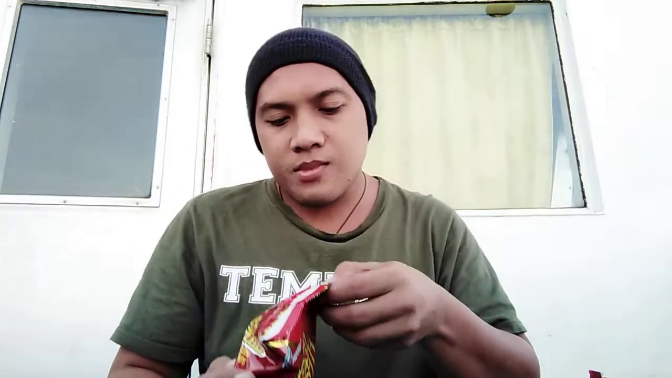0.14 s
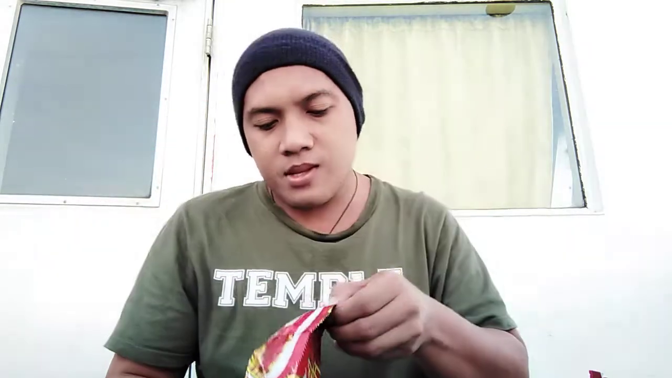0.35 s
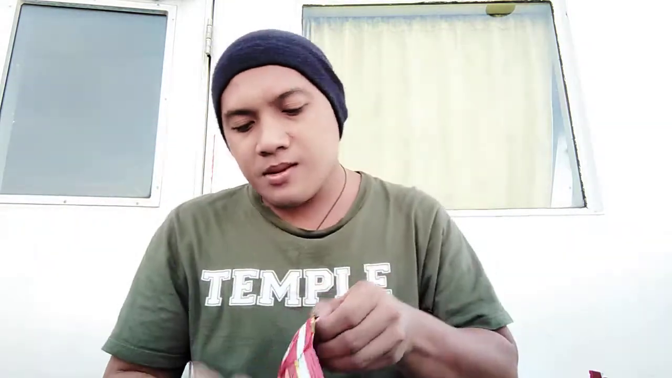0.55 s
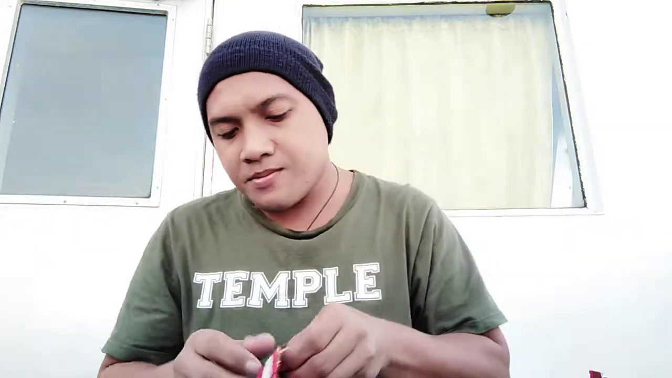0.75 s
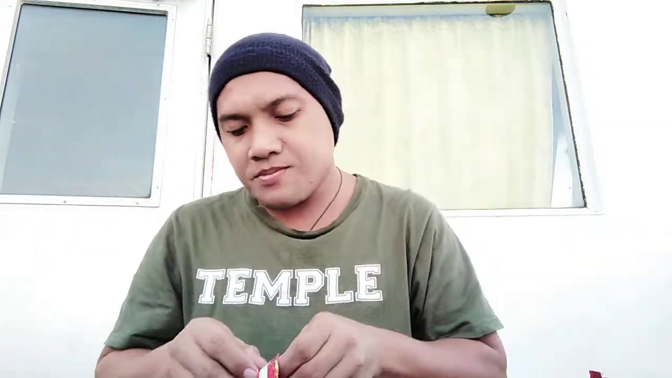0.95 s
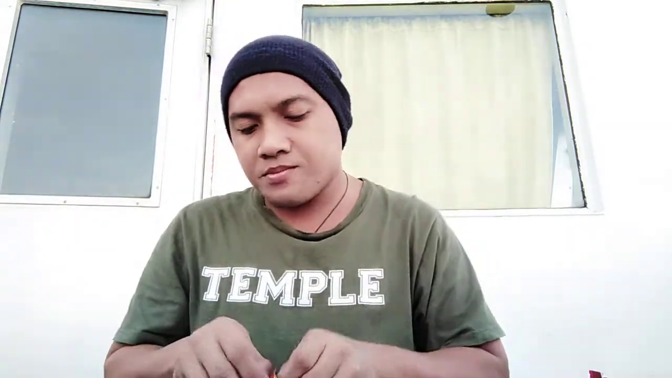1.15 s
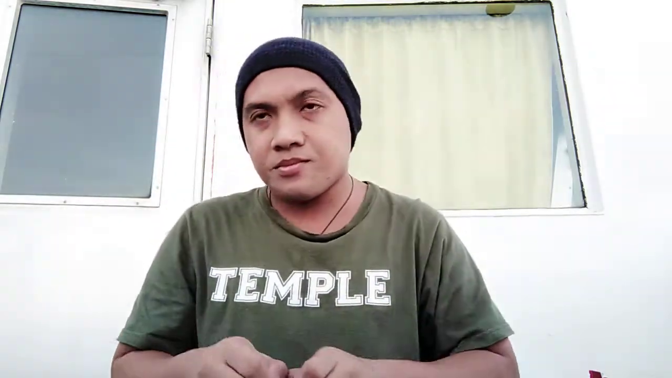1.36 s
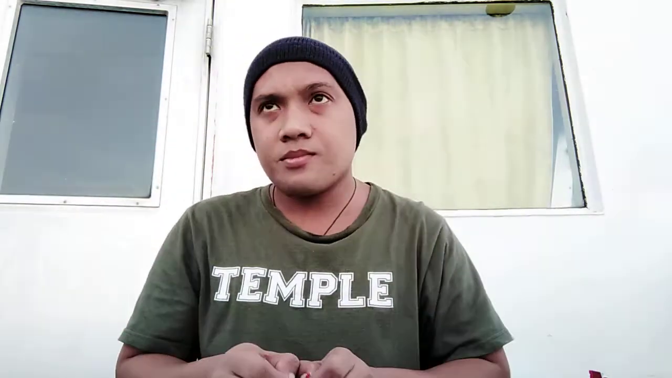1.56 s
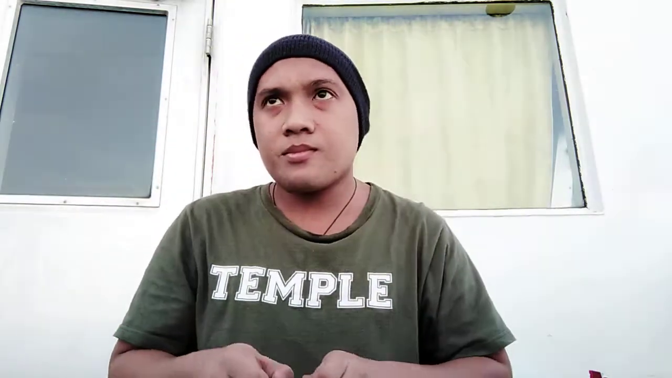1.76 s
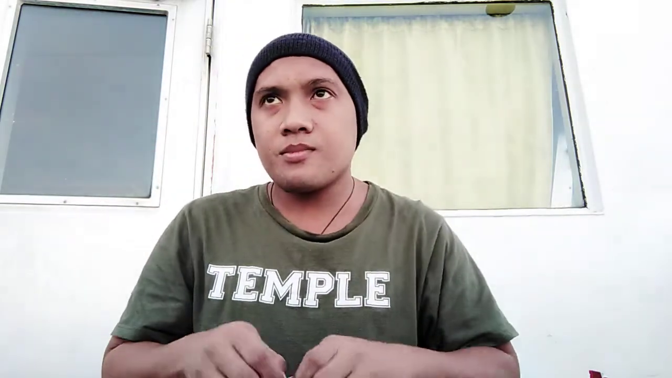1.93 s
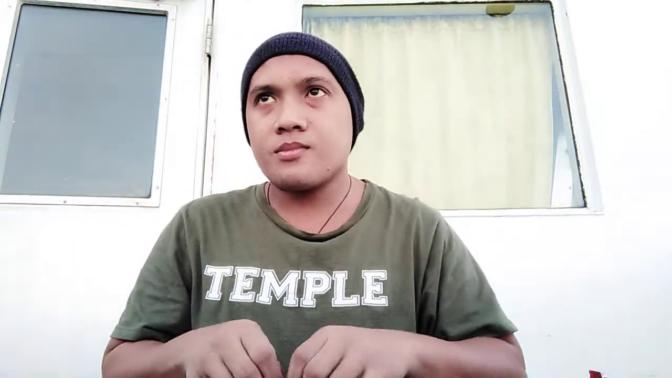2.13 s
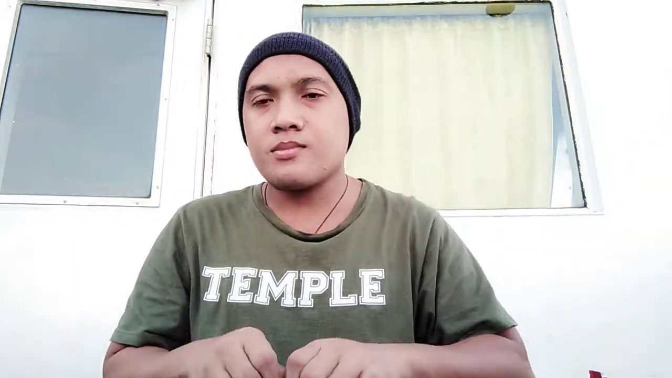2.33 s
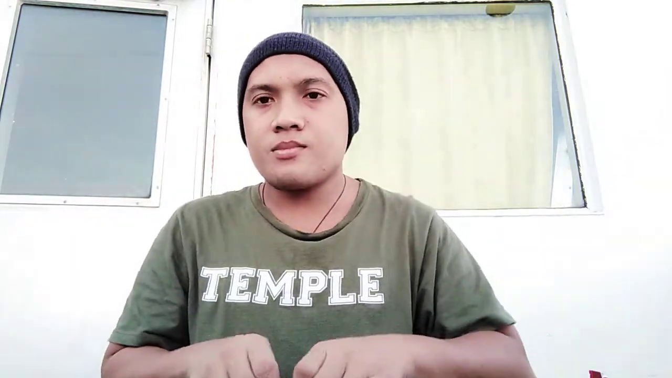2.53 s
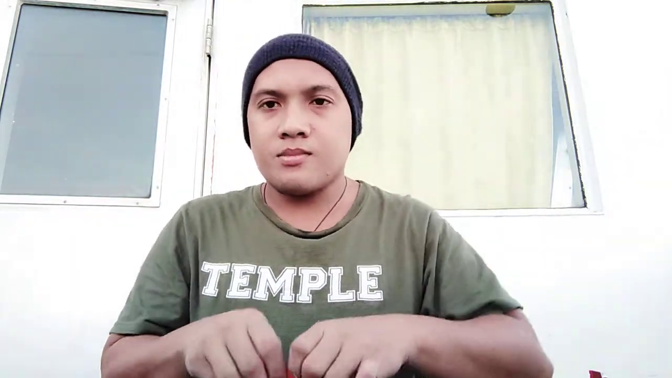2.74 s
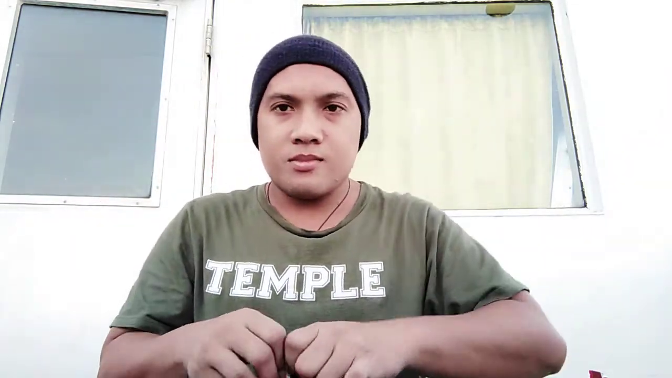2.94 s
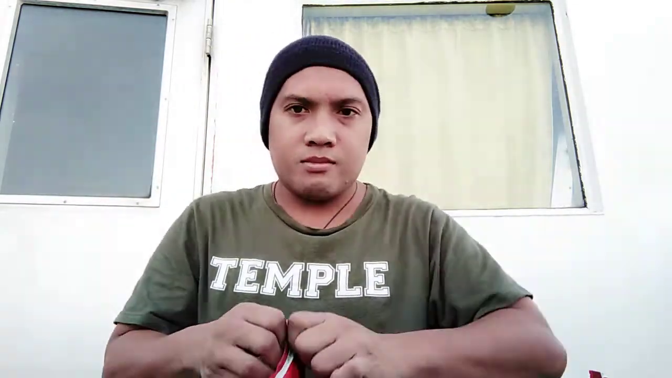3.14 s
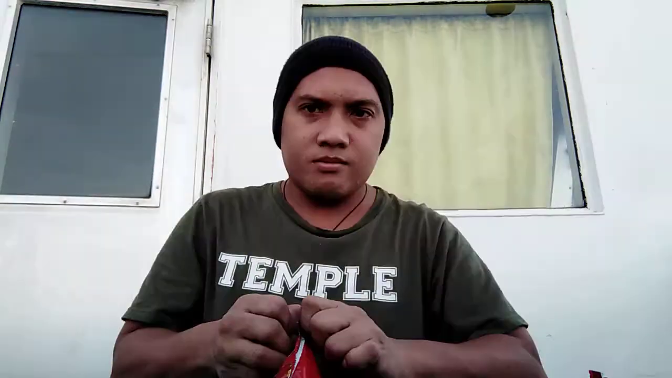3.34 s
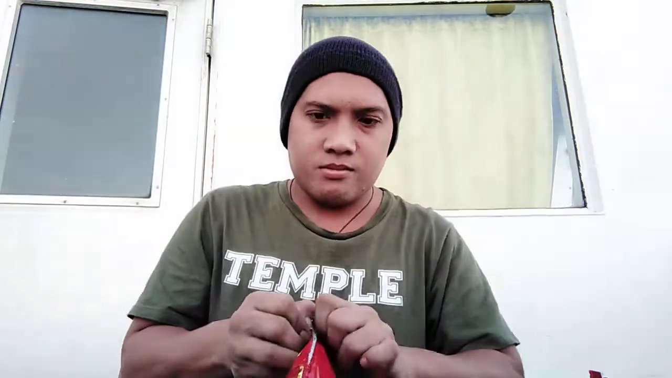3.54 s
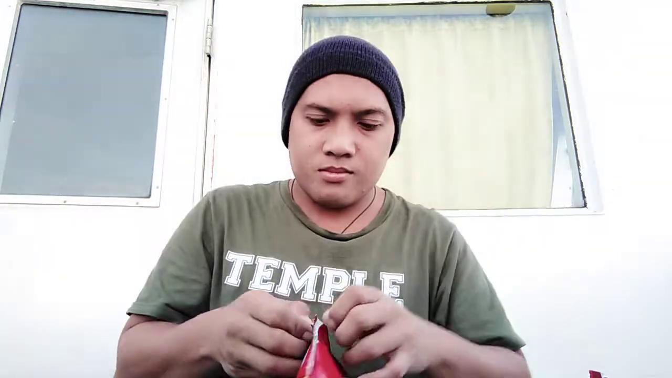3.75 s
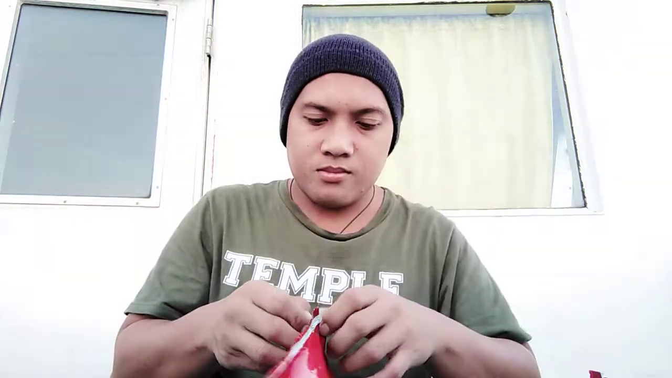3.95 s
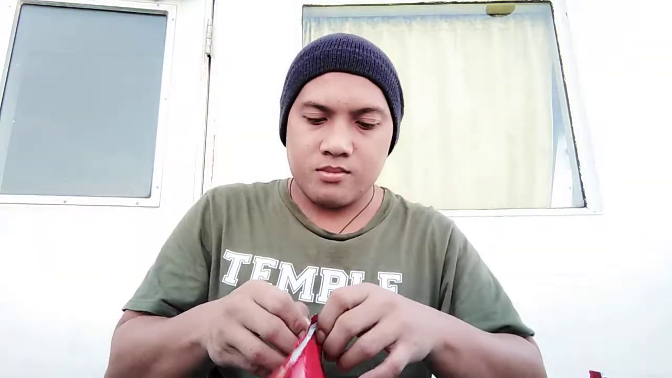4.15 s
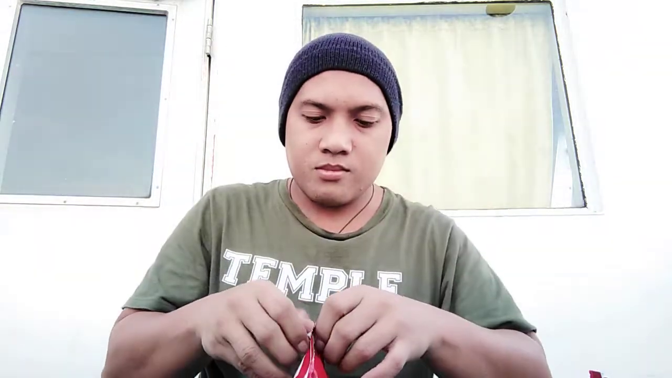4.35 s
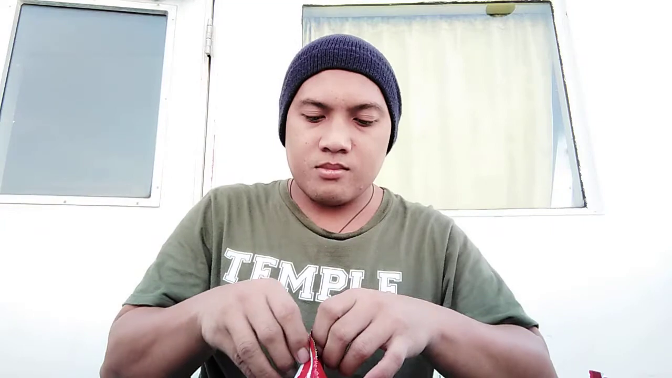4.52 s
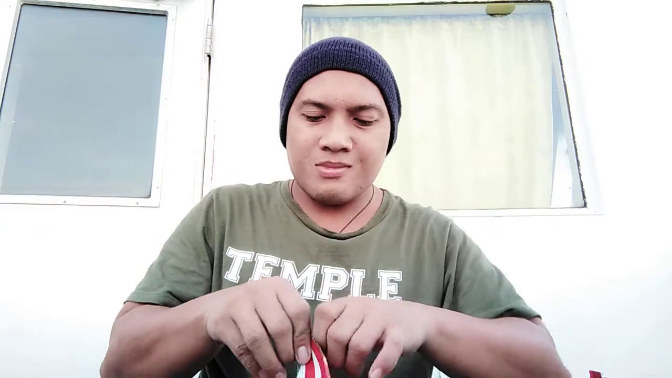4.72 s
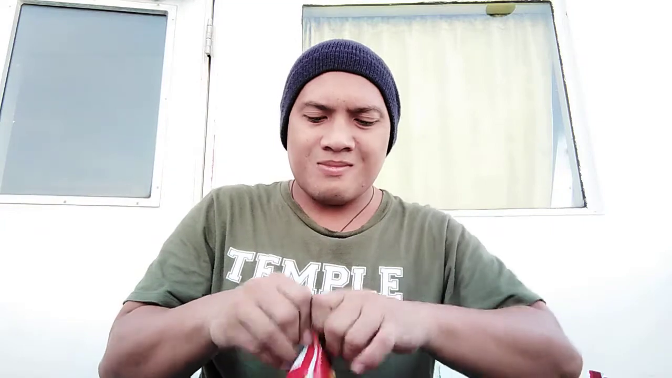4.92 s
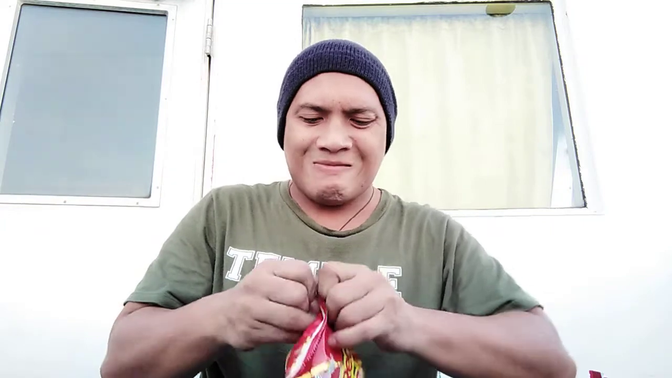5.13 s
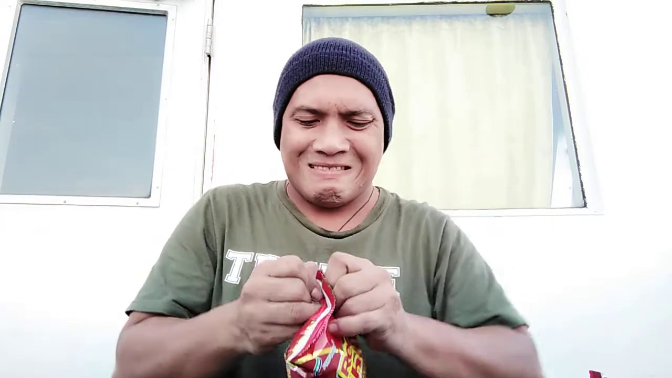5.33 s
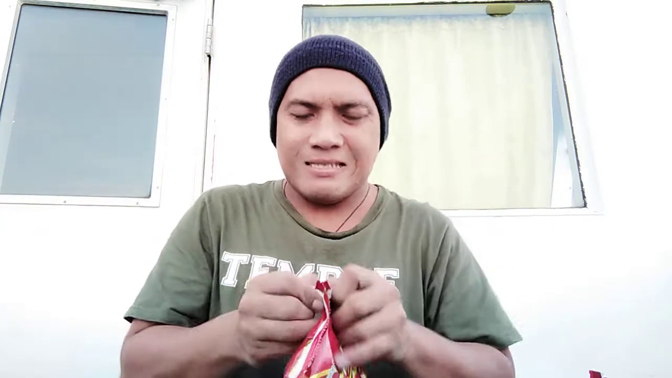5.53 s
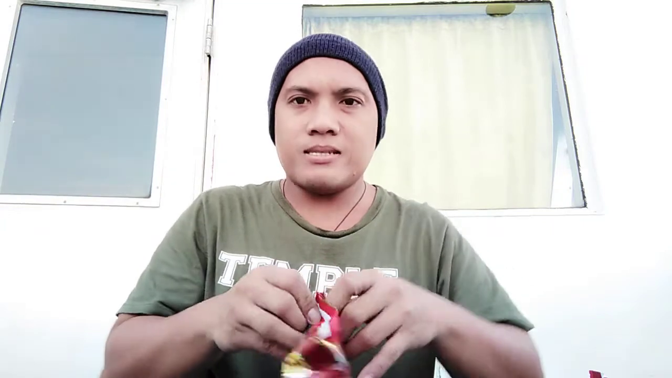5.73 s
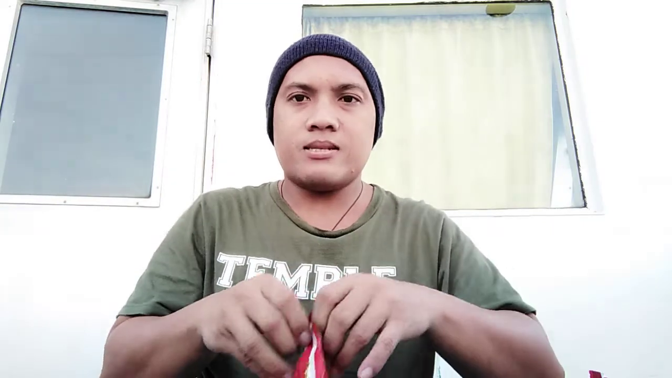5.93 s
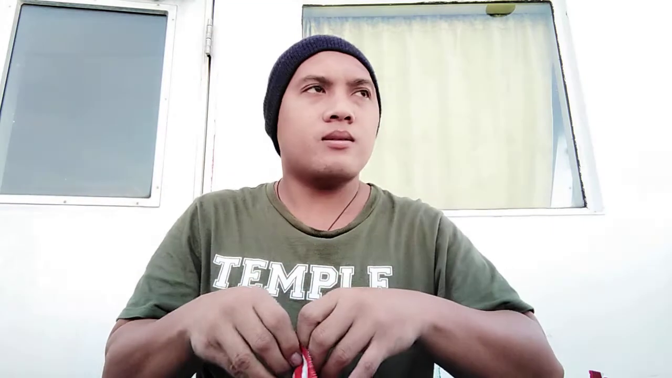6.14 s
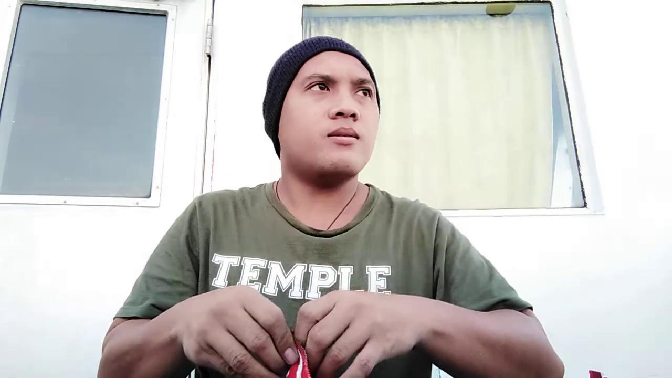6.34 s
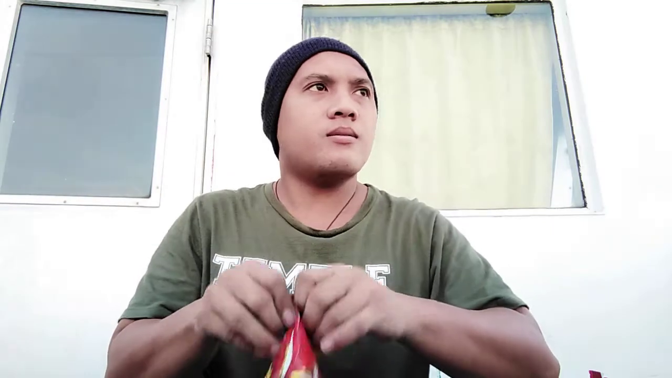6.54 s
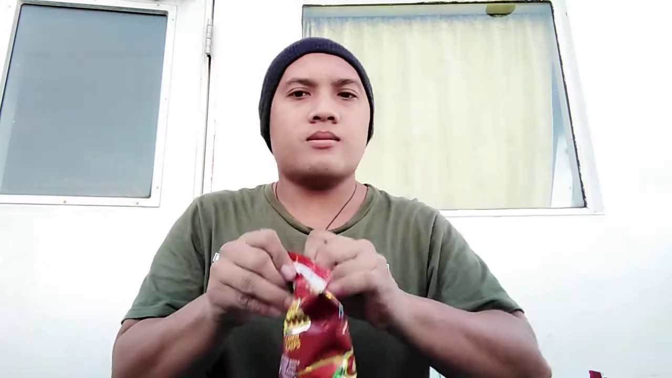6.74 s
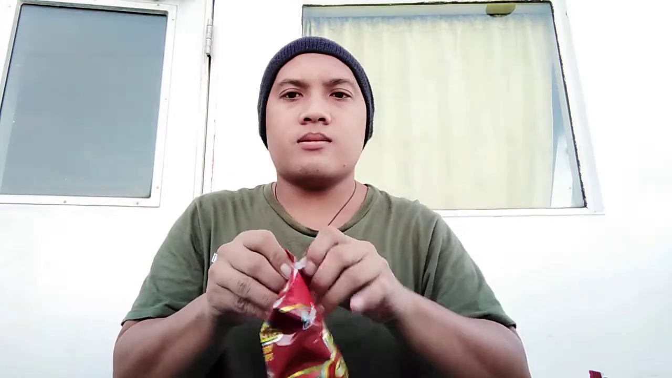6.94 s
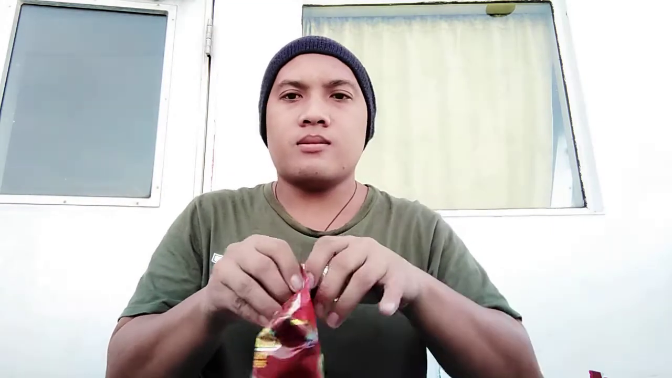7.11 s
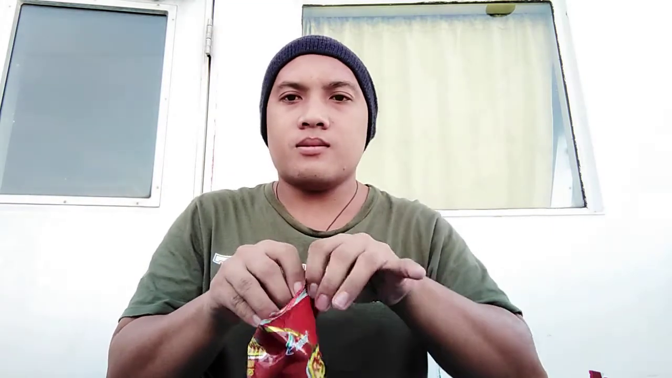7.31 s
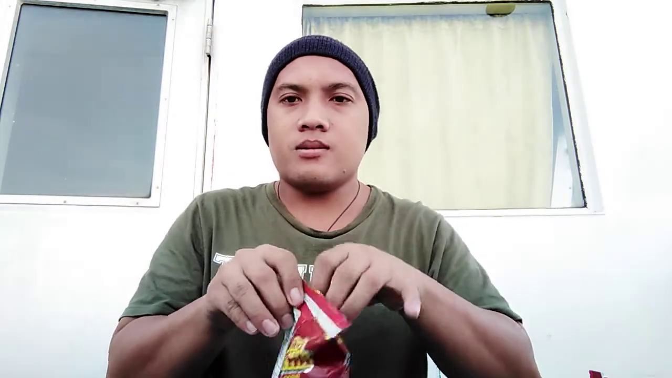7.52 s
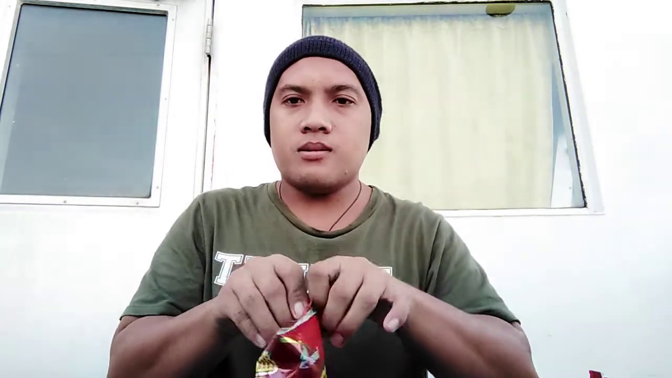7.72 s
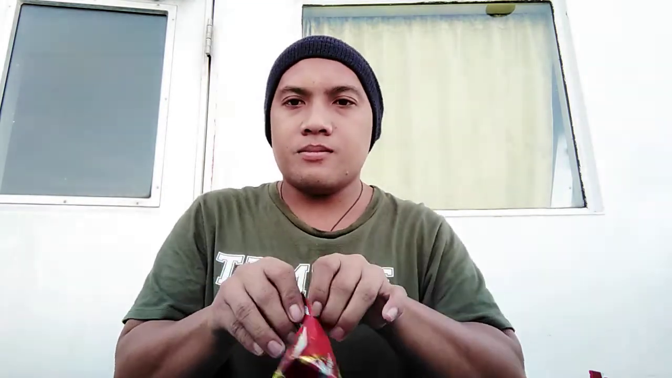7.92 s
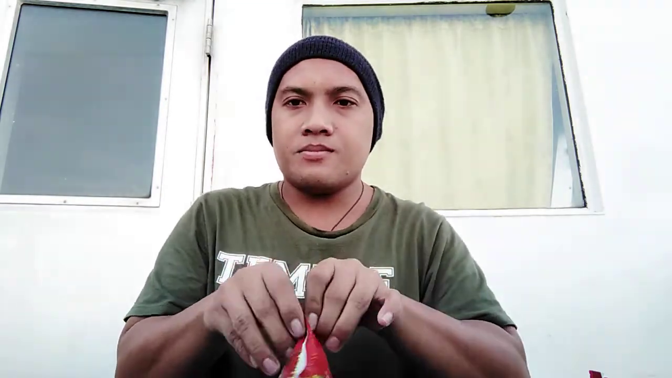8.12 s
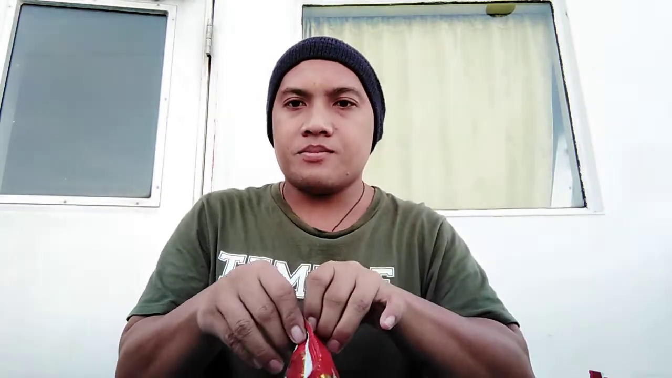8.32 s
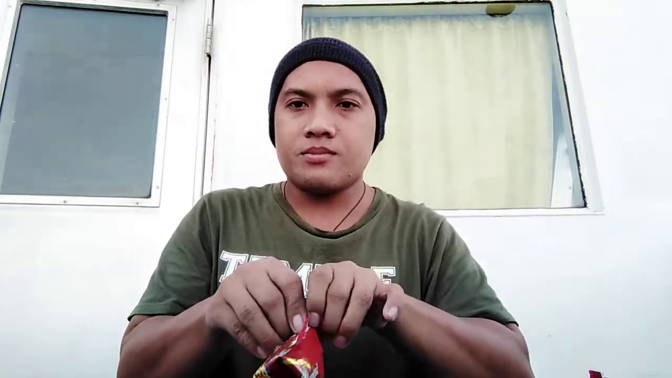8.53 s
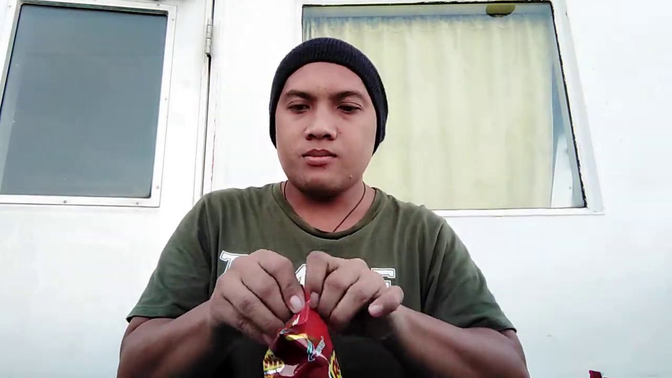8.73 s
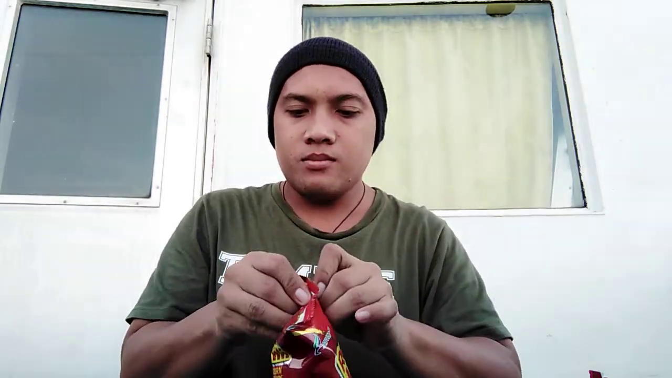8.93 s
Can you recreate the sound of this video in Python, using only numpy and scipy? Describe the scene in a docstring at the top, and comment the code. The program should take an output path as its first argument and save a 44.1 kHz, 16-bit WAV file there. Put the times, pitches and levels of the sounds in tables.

```python
"""A machine rumbles low behind a small hard room; an arm's length from a phone, hands twist a stiff snack bag.
Fine crackle of small random creases starts at once, and the film's large creases soon snap over it.
From 0.7 s the air pillow in the bag thumps too, as decaying sines; the crackle all but stops near 2.4 s
and is strongest soon after 5 s. From 7.9 to 8.7 s the deepest rumble, shaped noise, dies away.
A near wall and a noise tail return the bag's sound; two spaced ports each add a treble ring of their own."""
import sys
import numpy as np
from scipy import signal
from scipy.fft import rfft, irfft
from scipy.io import wavfile

SR = 44100
rng = np.random.default_rng(int(sys.argv[2]) if len(sys.argv) > 2 else 0)


def to_wav(sig):
    """Store sig (one row per channel, or 1-D mono) as 16-bit WAV at the path in sys.argv[1].

    Samples outside -1..1 are clipped; the rate is SR.
    """
    pcm = np.clip(np.atleast_2d(sig), -1, 1) * 32767
    pcm = np.round(pcm).astype(np.int16)
    wavfile.write(sys.argv[1], SR, pcm.T)  # frames by channels


def decibels_to_gain(level_db):
    """Convert a level in decibels to a linear amplitude gain (20 dB per decade)."""
    exponent = np.asarray(level_db, float) / 20
    return 10 ** exponent


N = 395577  # length in samples

# Resonances of the bag. Each row: centre in Hz, width in Hz, rise in dB.
BAG_MODES = [(308, 170, 21.5), (580.8, 114, 20.5), (791, 175, 19.5), (993, 232, 18), (1413, 504, 14.5),
             (2333, 870, 14.5)]
BAG_PAN_DB = 4.0  # usual left-over-right level of the creases: the bag sits left of centre


def curve(table, hz):
    """A (Hz, value) table read on a log-frequency axis."""
    f, v = np.transpose(table)
    return np.interp(np.log(np.maximum(hz, 1)), np.log(f), v)


def bump(hz, centre_hz, width_hz, db):
    """A resonance as a rise in dB."""
    return db / (1 + (2 * (hz - centre_hz) / width_hz) ** 2)


def causal(db):
    """Minimum-phase response of unit energy with the given gain in dB, by folding the cepstrum."""
    c = irfft(db * np.log(10) / 20)
    c[1:len(c) // 2] *= 2
    c[len(c) // 2 + 1:] = 0
    h = irfft(np.exp(rfft(c)))
    return h / np.sqrt(np.sum(h ** 2))


def colour(x, table, modes=()):
    """Ring x through a spectrum and its resonances."""
    hz = np.linspace(0, SR / 2, 4097)
    db = curve(table, hz) + sum(bump(hz, *m) for m in modes)
    return signal.fftconvolve(x, causal(db)[None], axes=1)[:, :N]


def place(times, gains, shapes):
    """Sum short shapes (events, ports, samples) at their times in seconds."""
    out = np.zeros((2, N + shapes.shape[2]))
    for t, g, s in zip(times, gains, shapes):
        i = min(max(int(t * SR), 0), N)
        out[:, i:i + s.shape[1]] += g * s
    return out[:, :N]


def two_port_noise(count, hz, apart_hz):
    """Noise spectra for two ports: alike in the bass, ever less so up to apart_hz, independent above."""
    z = rfft(rng.standard_normal((3, count)))
    alike = np.clip(1 - hz / apart_hz, 0, 1)
    return np.sqrt(alike) * z[0] + np.sqrt(1 - alike) * z[1:]


def rumble():
    """Loose low machine noise that favours a few room modes; alike at both ports in the bass."""
    # Shape of the noise. Each row: frequency in Hz, relative density in dB per Hz.
    rumble_spectrum = [(18, -29), (30, -30.5), (61, -21), (147, -12.5), (228, 1), (337, -12.5),
                       (612, -51.5), (1090, -80), (1340, -30.5), (1920, -56), (7430, -33.5), (15000, -53)]
    # Room modes. Each row: centre in Hz, width in Hz, rise in dB.
    rumble_modes = [(63.7, 26, 18.5), (106.9, 10.2, 15), (176.2, 12, 11.5), (571.5, 152, 34)]
    # Balance of the ports. Each row: frequency in Hz, left minus right in dB.
    rumble_tilt = [(110, -1), (200, 12.5), (700, 11.5), (2400, 8)]
    # The deepest part dies away. Each row: time in seconds, gain in dB.
    deep_fade = [(7.901, 5.5), (8.701, -6)]
    rms_db = -47
    hz = np.fft.rfftfreq(N, 1 / SR)
    db = curve(rumble_spectrum, hz) + sum(bump(hz, *m) for m in rumble_modes)
    db = db + np.outer([.5, -.5], curve(rumble_tilt, hz))
    x = irfft(two_port_noise(N, hz, apart_hz=1030.0) * decibels_to_gain(db), N)
    deep = irfft(rfft(x) / (1 + (hz / 135.0) ** 8), N)
    deep_gain = decibels_to_gain(np.interp(np.arange(N) / SR, *np.transpose(deep_fade)))
    x = x - deep * (1 - deep_gain)
    # it swells and sinks at random
    swell_db = 2.5 * np.interp(np.arange(N), np.linspace(0, N, 40), rng.standard_normal(40))
    x = x * decibels_to_gain(swell_db)
    return x * decibels_to_gain(rms_db) / np.sqrt(np.mean(x ** 2))


def bursts(count, decay_s, alike, patchy_db, rattle_db=-12, facet_db=-60, creak_db=-4, lag_spread=0):
    """A faint creak, a sharp tick and a short rattle of unit energy, each crease with its own colour.

    The ports share the noise by alike (0 to 1); lag_spread is in samples."""
    creak_rise_s, rattle_spread_db = .0012, 5
    facet_low_hz, facet_octaves, facet_width_hz = 1500, 1.2, 450
    t = np.arange(512) / SR - .002  # the tick is at zero
    creak = decibels_to_gain(creak_db) * np.exp(t / creak_rise_s)
    rattle = np.exp(-np.maximum(t, 0) / decay_s)
    z = rng.standard_normal((count, 3, 512))
    shape = np.where(t < 0, creak, rattle) * decibels_to_gain(rattle_db + rattle_spread_db * z[:, :1, :1])
    tick = np.sign(z[:, :1, 1:2]) * (np.arange(512) == np.argmin(abs(t)))
    alike = np.clip(alike, 0, 1)
    noise = np.sqrt(alike) * z[:, :1] + np.sqrt(1 - alike) * z[:, 1:]
    s = noise * shape + tick
    # facet size differs from crease to crease: broad random rises and dips over the octaves
    hz = np.fft.rfftfreq(512, 1 / SR)
    octave = np.log2(np.maximum(hz, 200) / 200)
    phase = rng.random((count, 3, 1)) + octave * np.array([[.3], [.6], [1.1]])
    patches = decibels_to_gain(patchy_db * np.cos(2 * np.pi * phase).sum(axis=1))
    # each facet rings somewhere above the lowest facet pitch
    facet_hz = facet_low_hz * 2 ** (facet_octaves * rng.random((count, 1)))
    ring = 1 + decibels_to_gain(facet_db) / (1 + 2j * (hz - facet_hz) / facet_width_hz)
    # each crease lies at its own angle to the ports: only the left one is shifted
    lag = np.round(lag_spread * z[:, :1, 2:3]) * np.array([[1], [0]])
    shift = np.exp(-2j * np.pi * np.fft.rfftfreq(512) * lag)
    s = irfft(rfft(s) * shift * (ring * patches)[:, None])
    return s / np.sqrt(np.sum(s ** 2, axis=2, keepdims=True))


def creases(s, db, middle_db, pan_db):
    """Each crease flips with a bright crack and a duller flap of the facet beside it, later at the left port."""
    # What the crack radiates. Each row: frequency in Hz, relative level in dB.
    film_treble = [(2500, -34), (3500, -7), (5500, -5), (8000, 0), (10500, -7.5), (13000, -20.5),
                   (15000, -25)]
    # What the flap radiates, before the bag's modes. Each row: frequency in Hz, relative level in dB.
    film_middle = [(700, -9.5), (1100, -10), (1600, 4), (2400, 0.5), (3200, 7.5), (4500, -0.5)]
    crack_drive_db, flap_drive_db = 10, 19.5  # make up for each filter
    flap_lag = 20  # samples by which the left port hears the flap later
    side = decibels_to_gain(np.outer(pan_db, [.5, -.5]))[:, :, None]
    start = s - .0015  # the creak comes first
    cracks = bursts(len(s), .0025, alike=0.011, patchy_db=2.3, rattle_db=-17, lag_spread=14)
    crack = place(start, decibels_to_gain(db), side * cracks)
    flaps = bursts(len(s), 0.0035, alike=0.63, patchy_db=2.5, rattle_db=-4.5, facet_db=5, creak_db=-2)
    flap = place(start + .001, decibels_to_gain(db + middle_db), flaps)
    flap = np.array([np.roll(flap[0], flap_lag), flap[1]])
    bright = decibels_to_gain(crack_drive_db) * colour(crack, film_treble)
    return bright + decibels_to_gain(flap_drive_db) * colour(flap, film_middle, BAG_MODES)


def crackle(count, spread_db):
    """Times and sizes of small creases: flurries with gaps between, a few much larger than the rest."""
    flurry_size, mean_wait_s, biggest_db = 5, .02, 11
    chance = rng.random((count, 3))
    flurry = np.repeat(chance[::flurry_size, 0], flurry_size)[:count] * N / SR
    times = flurry - mean_wait_s * np.log(chance[:, 2] + 1e-6)
    size_db = np.minimum(-spread_db * np.log(chance[:, 1] + 1e-9), biggest_db)
    return times, size_db


def handling():
    """Small creases and a low crumple follow the effort of the hands."""
    # How hard the hands work the film. Each row: time in seconds, fine crackle level in dB before its drive.
    effort = [(0.0, -51), (0.17, -53), (1.699, -51), (2.02, -54.5), (2.271, -60.5), (2.439, -93),
              (2.5, -41.5), (2.67, -43.5), (2.77, -53), (2.95, -52.5), (3.17, -48), (3.62, -71.5),
              (3.82, -70.5), (4.67, -68), (5.04, -44.5), (5.17, -32.5), (5.32, -39.5), (5.821, -40.5),
              (5.97, -55.5), (7.12, -55), (7.39, -49.5), (8.07, -60.5), (8.42, -52.5), (8.67, -56),
              (8.97, -52.5)]
    # What the low crumple radiates, before the bag's modes. Each row: frequency in Hz, relative level in dB.
    crumple_spectrum = [(120, 12), (250, -17), (600, 6), (1200, -6), (2500, 3.5), (4000, 1)]
    crumple_db, crumple_per_effort = -47, 1.77  # level at median effort before the drive; dB per dB of effort
    drive_db = 2.5  # for both layers
    s, db = np.transpose(effort)
    t, size_db = crackle(count=1100, spread_db=5.0)
    own = rng.standard_normal((len(t), 2))
    fine = creases(t, np.interp(t, s, db) + size_db, -6 + 4 * own[:, 0], BAG_PAN_DB + 5 * own[:, 1])
    t, size_db = crackle(count=2000, spread_db=3.0)
    low_db = crumple_db + crumple_per_effort * (np.interp(t, s, db) - np.median(db))
    dull = place(t, decibels_to_gain(low_db + size_db), bursts(len(t), 0.0018, alike=0.89, patchy_db=1.5))
    return decibels_to_gain(drive_db) * (fine + colour(dull, crumple_spectrum, BAG_MODES))


def snaps():
    """The large creases; each sets off four smaller neighbours, most within some hundredths of a second."""
    # Creases snapping over. Each row: time in seconds, treble level in dB before the drive,
    # middle band against treble in dB, likewise before the drives.
    large_creases = [(0.0212, -26, -10.5), (0.1995, -12.5, -14), (0.2739, -13, -15.5), (0.3, -17, -12),
                     (0.3732, -26, -8.5), (0.5757, -27, -5.5), (0.631, -26, -4), (0.701, -11.5, -12),
                     (0.8101, -13.5, -13.5), (0.8227, -14, -10), (0.83, -18, -10.5), (0.856, -21.5, -5),
                     (0.9152, -22, -36), (1.009, -30, -10), (1.064, -27, -5), (1.1092, -31.5, 4),
                     (1.1816, -37, -4), (1.27, -32, -22), (1.281, -10, -17.5), (1.4021, -27, 1.5),
                     (1.4223, -17, -3.5), (1.4436, -16, -2.5), (1.516, -9.5, -9), (1.5227, -11.5, -17),
                     (1.5326, -7.5, -12.5), (1.722, -29, -3), (1.7985, -9.5, -26), (1.877, -37, 2),
                     (1.934, -40, 0), (1.939, -14, -17), (1.9834, -12.5, -16.5), (2.0773, -32, -6.5),
                     (2.114, -18.5, -9.5), (2.1264, -5.5, -25), (2.4854, -38, -3.5), (2.5105, -18.5, -22),
                     (2.5433, -24.5, -4), (2.5695, -16, -8), (2.602, -9.5, -12.5), (2.6342, -3.5, -13.5),
                     (2.6688, -9, -29.5), (2.7382, -33, 1.5), (2.758, -16.5, -14), (2.8065, -17, -15),
                     (2.8652, -21.5, -21), (2.895, -35, 3.5), (2.932, -31.5, -38), (2.9445, -31.5, -2),
                     (2.961, -29.5, -9.5), (3.12, -19.5, -7), (3.1435, -2, -30.5), (3.1542, -19.5, -29),
                     (3.245, -42, 3), (3.2594, -10, -11.5), (3.3819, -6, -21.5), (3.4335, -35, -36),
                     (3.478, -18.5, -15.5), (3.4946, -10.5, -24.5), (3.58, -14.5, -11.5),
                     (3.6659, -21, -10), (3.6959, -16.5, -14.5), (3.7228, -13.5, -8.5), (3.7514, -12, -15),
                     (4.134, -33.5, -3.5), (4.299, -10, -17.5), (4.4051, -34, -7.5), (4.4426, -13, -15.5),
                     (4.6705, -8.5, -21), (4.7318, -14, -15.5), (4.7733, -12, -25), (4.9344, -18, -6),
                     (5.033, -9, -14.5), (5.0376, -9.5, -23), (5.0712, -20, -1), (5.1066, -15, -4.5),
                     (5.129, -16, -5), (5.16, 2.5, -27), (5.1627, -1.5, -35), (5.1775, -13.5, -14),
                     (5.2215, -9.5, -9.5), (5.2426, -9, -13), (5.259, -13.5, -5.5), (5.2988, -11, -16),
                     (5.32, -9.5, -20), (5.345, -1, -20.5), (5.375, -8, -14), (5.386, -5.5, -24),
                     (5.395, -11.5, -3.5), (5.4068, 0, -18.5), (5.4624, -15, -20.5), (5.4648, -2.5, -21),
                     (5.5027, -12.5, -15.5), (5.512, -16.5, -11.5), (5.5706, -8.5, -19.5),
                     (5.618, -15, -12), (5.6422, -7, -15), (5.6833, -6, -15.5), (5.7627, -15, -33),
                     (5.7934, -18.5, -10), (5.8063, -12.5, -21), (5.8614, 2.5, -25.5), (5.906, -4.5, -18.5),
                     (5.9469, -14, -20.5), (6.0567, -23.5, -2.5), (6.131, -27, -16.5), (6.15, -5.5, -22.5),
                     (6.244, -31, -7.5), (6.287, -21.5, -6), (6.317, -10, -11.5), (6.399, -35, -5),
                     (6.409, -12.5, -17), (6.491, -21, -11.5), (6.5826, -25.5, -12.5), (6.649, -28.5, -12),
                     (6.6746, -10.5, -12.5), (6.69, -13.5, -23), (6.734, -0.5, -23), (6.751, -14.5, -8),
                     (6.762, -10, -16), (6.7901, -7, -5.5), (6.7998, -4.5, -20), (6.8482, -14.5, -10.5),
                     (6.967, -35, 3), (6.9792, -23.5, -10), (7.051, -32.5, -19), (7.152, -24.5, -10),
                     (7.227, -28, -5.5), (7.2476, -22, -11), (7.2932, -18.5, -9), (7.3016, -15.5, -30),
                     (7.3134, -12, -36), (7.3999, -19.5, -13.5), (7.4528, -20, -3), (7.522, -21, -10),
                     (7.642, -4.5, -18), (7.6752, -3, -16.5), (7.8044, -40.5, 1.5), (7.8394, -31.5, -20),
                     (7.9384, -17, -16), (8.0439, -24.5, -15), (8.1399, -24.5, -6), (8.204, -30.5, -6),
                     (8.2242, -28, 7), (8.262, -26.5, -7), (8.2851, -25, -2), (8.3465, -25, -21),
                     (8.3766, -17, -12.5), (8.4191, -31, -3), (8.4329, -23, -12.5), (8.4472, -19, -9.5),
                     (8.515, -31, -12), (8.524, -7.5, -22.5), (8.5847, -49, 15), (8.64, -22, -41),
                     (8.6813, -32.5, 9.5), (8.6965, -21, -19), (8.713, -24, -5.5), (8.803, -29, -29),
                     (8.822, -27.5, -2.5), (8.828, -11, -27), (8.836, -16.5, -36), (8.8787, -4, -42),
                     (8.9073, -8.5, -14.5)]
    loudest_db, range_db, mean_wait_s = -13, 16, .011  # neighbour against its crease; range below; wait
    s, db, middle_db = np.transpose(large_creases)
    pan_db = BAG_PAN_DB + 3.0 * rng.standard_normal(len(s))  # each crease faces its own way
    chance = rng.random((4, 4, len(s)))  # (property, neighbour, crease)
    later = s + .004 - mean_wait_s * np.log(chance[0] + 1e-6)
    smaller_db = db + loudest_db - range_db * chance[1]
    near_middle_db = middle_db + 8 * (chance[2] - .5)
    near_pan_db = pan_db + 8 * (chance[3] - .5)
    return creases(np.append(s, later), np.append(db, smaller_db),
                   np.append(middle_db, near_middle_db), np.append(pan_db, near_pan_db))


def thumps():
    """The trapped air rings a few cycles at a pitch set by the grip, roughened by the film that holds it."""
    # Squeezes of the air pillow. Each row: time in seconds, level in dB before the drive, pitch in Hz.
    squeezes = [(0.7, -9, 800), (0.817, -11, 644), (1.443, -8, 348), (1.511, -10, 496), (1.979, -16, 348.5),
                (2.602, -16.5, 371), (2.633, -13.5, 388), (2.901, -23.5, 313), (3.265, -13.5, 324.5),
                (3.378, -13.5, 760), (3.58, -14.5, 838), (3.72, -18, 905), (4.446, -24.5, 600),
                (4.695, -32, 830), (4.95, -26, 910), (4.975, -26, 890), (5.124, -6.5, 270.4),
                (5.174, -10, 549), (5.222, -9.5, 340), (5.297, -11.5, 371), (5.342, -12.5, 312),
                (5.407, -7, 597), (5.682, -11, 662), (6.675, -16.5, 994), (6.74, -20.5, 370),
                (6.79, -16.5, 618), (7.296, -16.5, 342.6), (7.458, -21, 305), (7.515, -23, 326),
                (7.666, -17.5, 825), (8.227, -23, 371), (8.68, -18, 647), (8.906, -22, 983)]
    drive_db = 1
    s, db, hz = np.transpose(squeezes)
    t = np.arange(1200) / SR
    wobble = np.cumsum(rng.standard_normal((len(s), 1200)), axis=1) * 0.016  # in cycles
    turns = hz[:, None] * t
    lower = np.sin(2 * np.pi * (turns + wobble))
    # the wall of the pillow rings higher
    upper = decibels_to_gain(-7.5) * np.sin(2 * np.pi * 1.849 * (turns + 2 * wobble))
    swell_and_decay = np.exp(-turns / 1.83) * (1 - np.exp(-turns / 1.17))
    ring = (lower + upper) * swell_and_decay
    side = decibels_to_gain(np.array([[1.5], [-1.5]]))  # louder on the left
    return decibels_to_gain(drive_db) * place(s, decibels_to_gain(db), ring[:, None] * side)


def room(x):
    """Direct sound, wall echoes and a soft-starting tail, treble dying first and bass shared by the ports."""
    # Near wall and its window recess. Each row: delay in seconds, level in dB against the direct sound.
    wall_echoes = [(.0088, -15), (.0095, -15)]
    # Decay of the tail. Each row: frequency in Hz, time to fall 60 dB in seconds.
    tail_decay = [(300, 0.62), (800, 0.25), (2100, 0.19), (5500, 0.19), (12000, 0.11)]
    tail_db = -7.5  # whole tail's energy against the direct sound
    early_db, early_t60_s = -0.5, 0.096  # early excess over the tail, falling on top of the tail's own decay
    t = np.arange(int(.5 * SR)) / SR
    hz = np.fft.rfftfreq(len(t), 1 / SR)
    noise = two_port_noise(len(t), hz, apart_hz=1740.0)
    tail = 0
    for centre in 88 * 2. ** np.arange(8):  # overlapping octave bands
        share = np.maximum(1 - abs(np.log2(np.maximum(hz, 1) / centre)), 0)
        decay = np.exp(-np.log(1000) * t / curve(tail_decay, centre))
        tail = tail + irfft(noise * share, len(t)) * decay
    early = 1 + decibels_to_gain(early_db) * np.exp(-np.log(1000) * t / early_t60_s)
    onset = 1 - np.exp(-(t / 0.0061) ** 3)
    tail = tail * early * onset
    h = decibels_to_gain(tail_db) * tail / np.sqrt(np.sum(tail ** 2, axis=1, keepdims=True))
    h[:, 0] += 1  # direct sound
    for delay, db in wall_echoes:
        h[:, int(delay * SR)] += decibels_to_gain(db)
    return signal.fftconvolve(x, h, axes=1)[:, :N]


def scene():
    """The bag in the room over the rumble; the bag is too small to radiate the deep bass."""
    bag_low = signal.butter(4, 195, "high", fs=SR, output="sos")
    bag = signal.sosfilt(bag_low, handling() + snaps() + thumps())
    return rumble() + room(bag)


def roll_off(x):
    """The treble ends steeply here."""
    return signal.sosfilt(signal.butter(12, 15610, fs=SR, output="sos"), x)


def record(dry):
    """Each microphone port has its own ring and tilt; peaks over full scale clip, then both ends are cut."""
    # Treble ring of the left, then the right port. Each row: centre in Hz, width in Hz, rise in dB.
    port_rings = [(8860, 1910, 8), (7560, 2800, 8)]
    # Balance of the ports. Each row: frequency in Hz, left minus right in dB.
    port_tilt = [(700, 0.5), (2400, 1), (4400, -4.5), (8100, 0.5), (15000, 4.5)]
    hz = np.linspace(0, SR / 2, 1025)
    out = np.zeros_like(dry)
    for k, (ring, sign) in enumerate(zip(port_rings, (.5, -.5))):
        db = bump(hz, *ring) + sign * curve(port_tilt, hz)
        response = causal(db) * np.sqrt(np.mean(decibels_to_gain(db) ** 2))  # undo the unit energy
        out[k] = signal.fftconvolve(dry[k], response)[:N]
    out = np.clip(out, -1, 1)
    out = signal.sosfilt(signal.butter(2, 45., "high", fs=SR, output="sos"), out)
    out = signal.sosfilt(signal.cheby1(8, .3, 14300, fs=SR, output="sos"), out)
    return roll_off(out)


dry = scene()
out = record(dry)
to_wav(out)
```